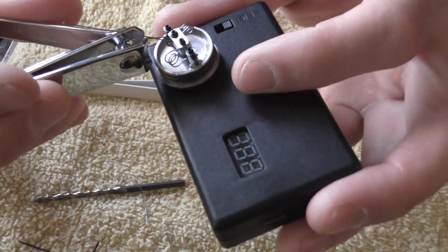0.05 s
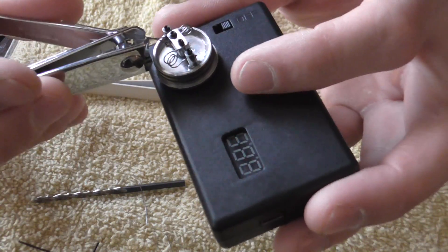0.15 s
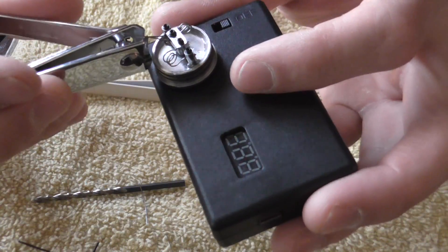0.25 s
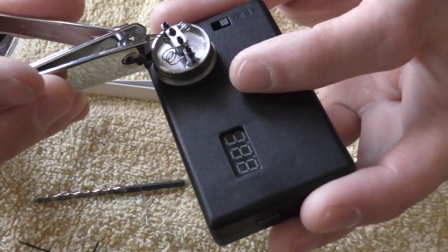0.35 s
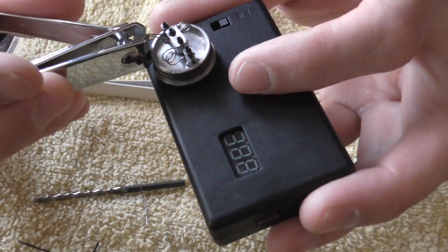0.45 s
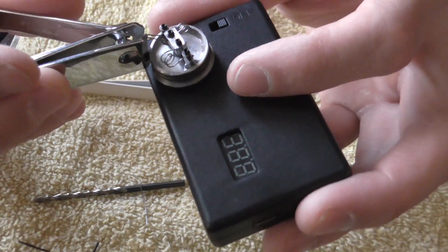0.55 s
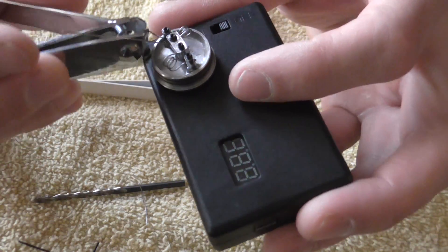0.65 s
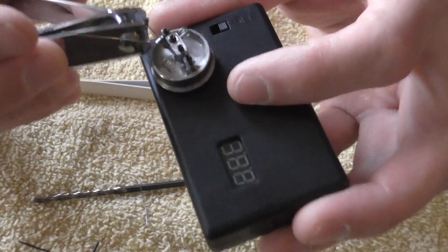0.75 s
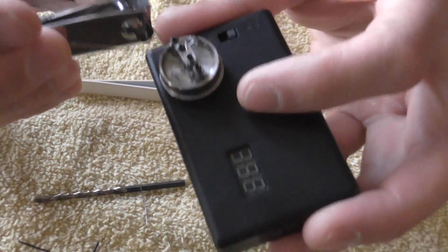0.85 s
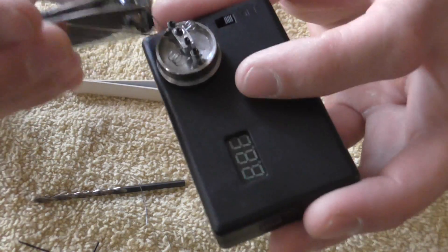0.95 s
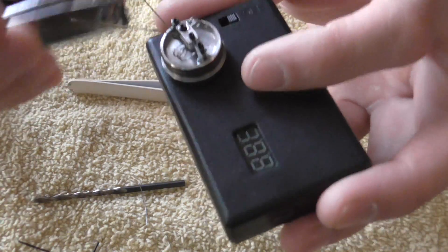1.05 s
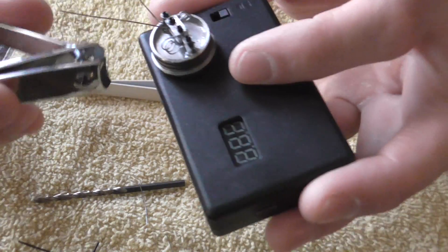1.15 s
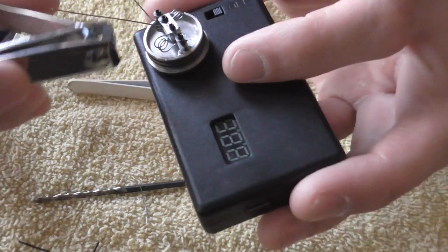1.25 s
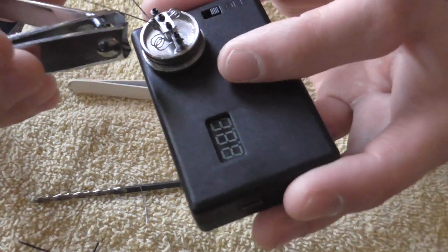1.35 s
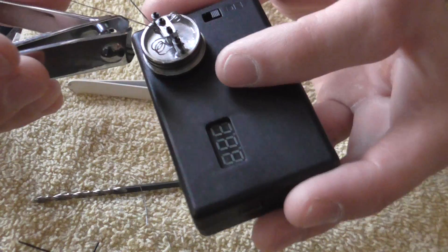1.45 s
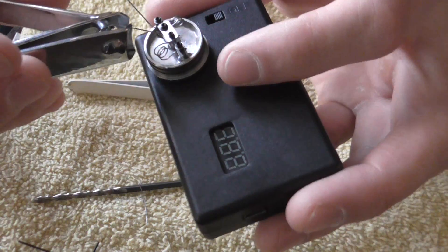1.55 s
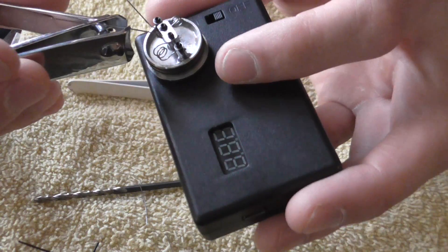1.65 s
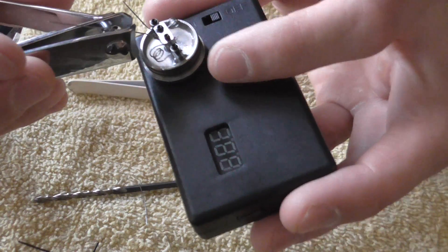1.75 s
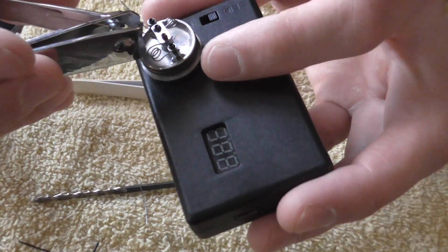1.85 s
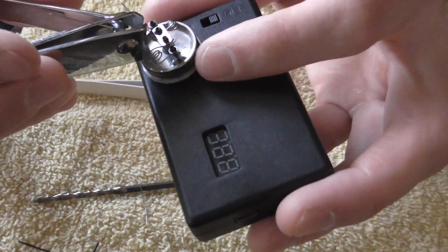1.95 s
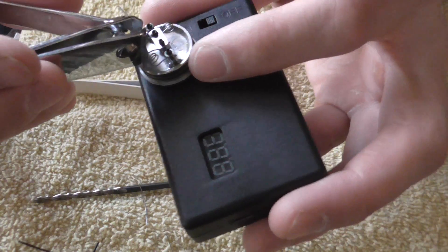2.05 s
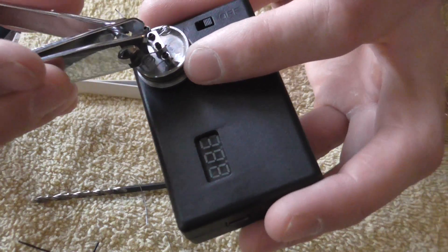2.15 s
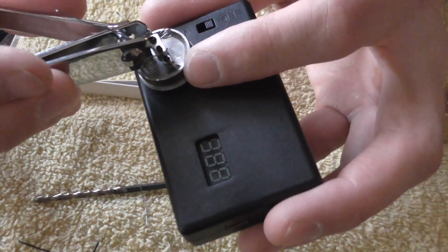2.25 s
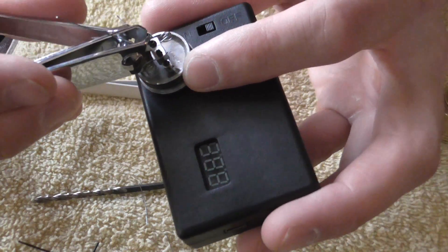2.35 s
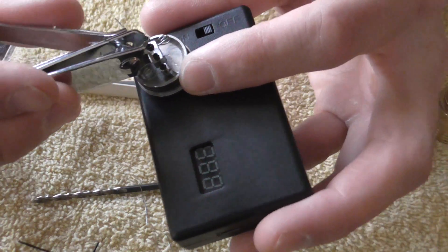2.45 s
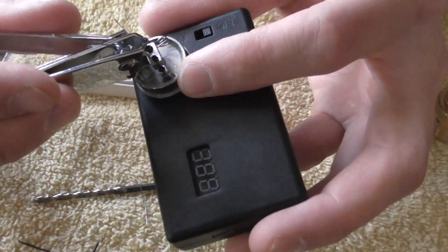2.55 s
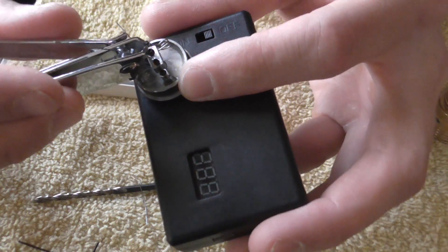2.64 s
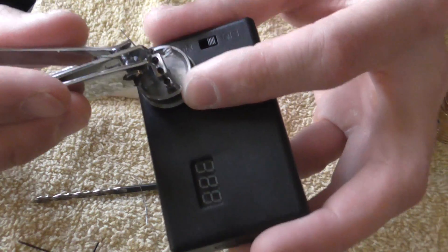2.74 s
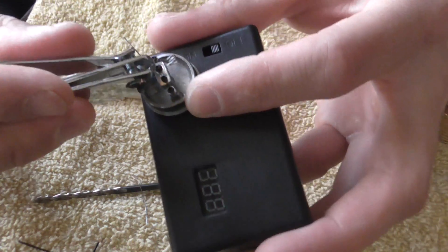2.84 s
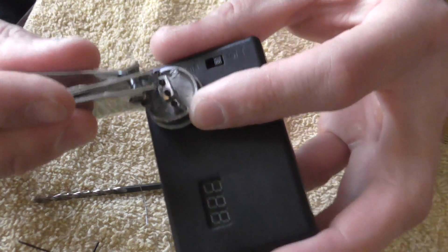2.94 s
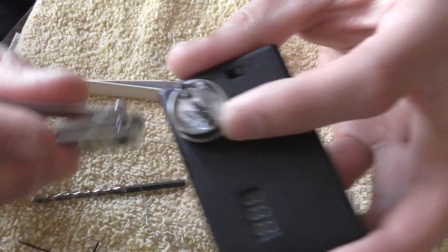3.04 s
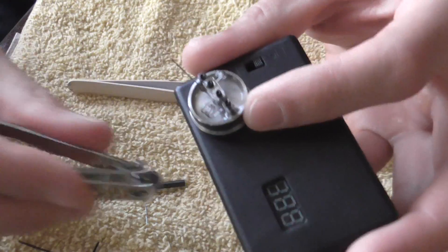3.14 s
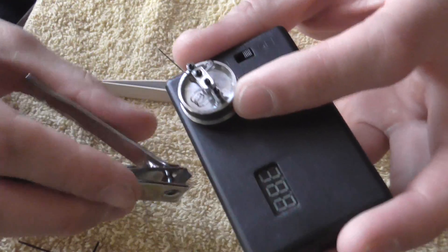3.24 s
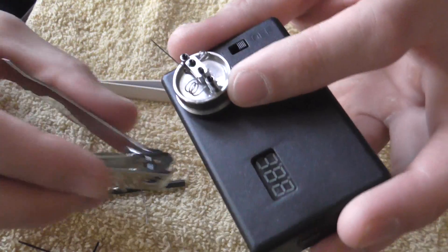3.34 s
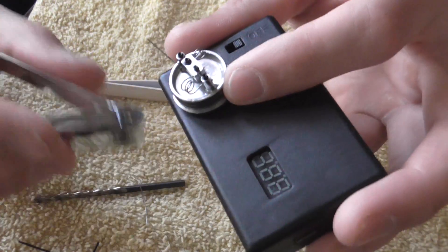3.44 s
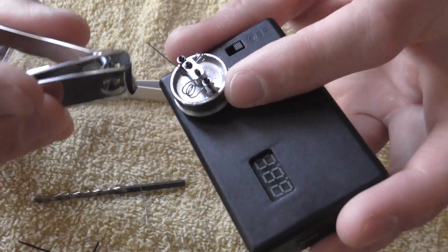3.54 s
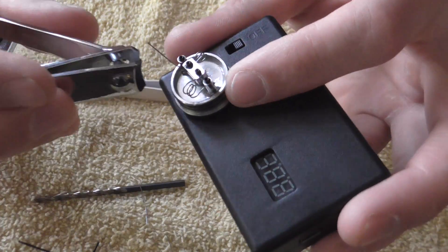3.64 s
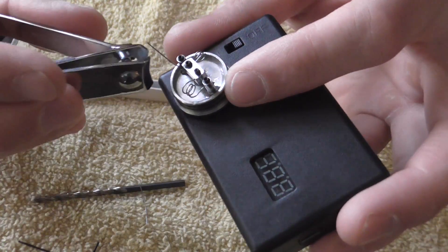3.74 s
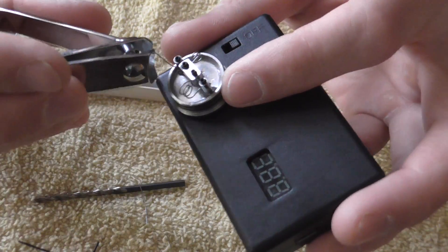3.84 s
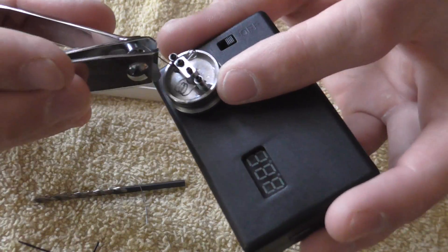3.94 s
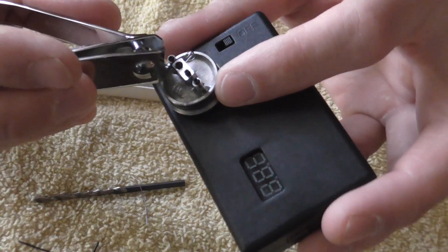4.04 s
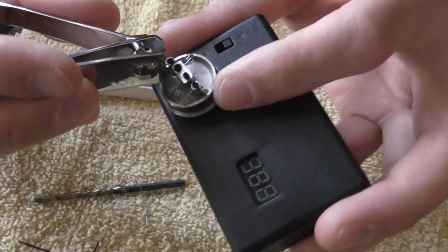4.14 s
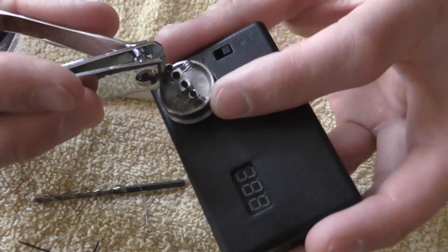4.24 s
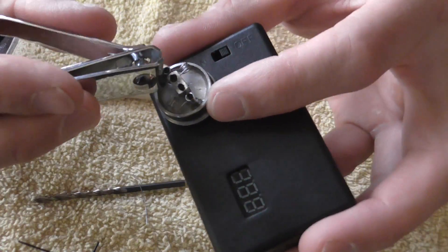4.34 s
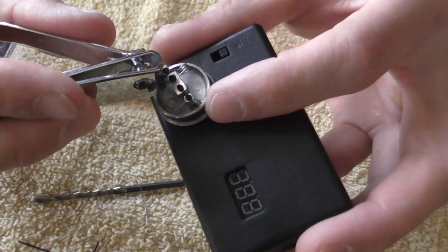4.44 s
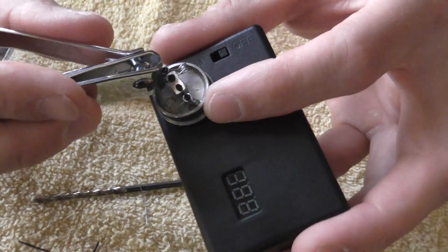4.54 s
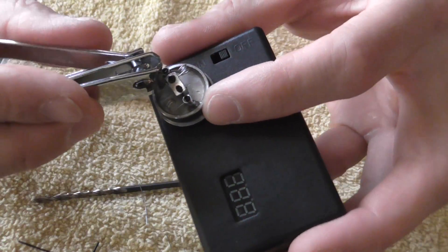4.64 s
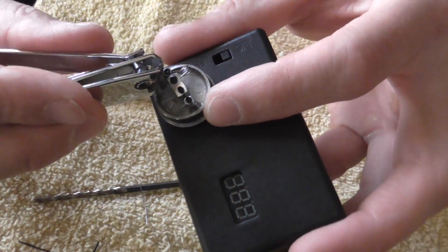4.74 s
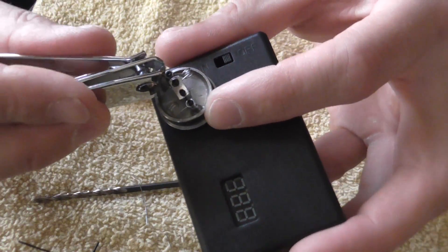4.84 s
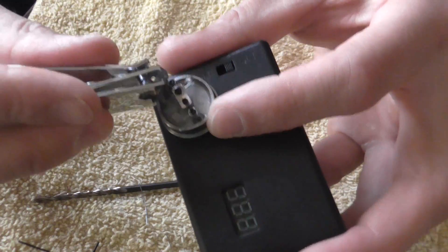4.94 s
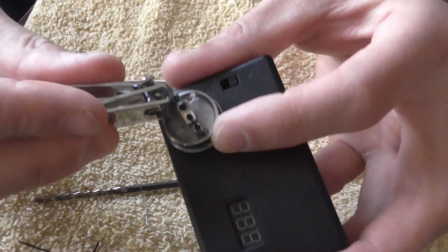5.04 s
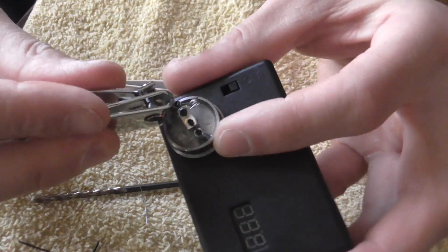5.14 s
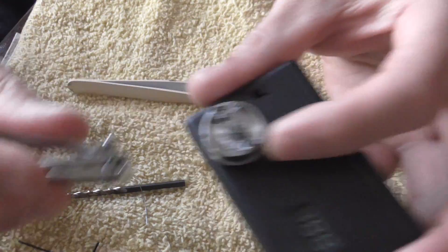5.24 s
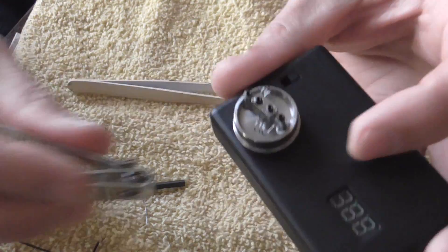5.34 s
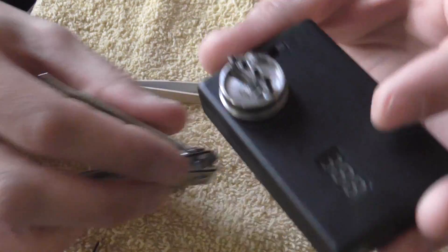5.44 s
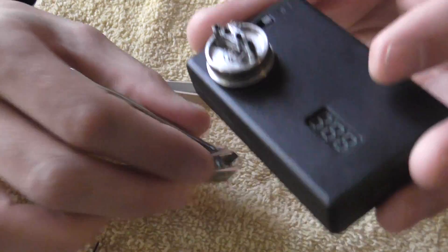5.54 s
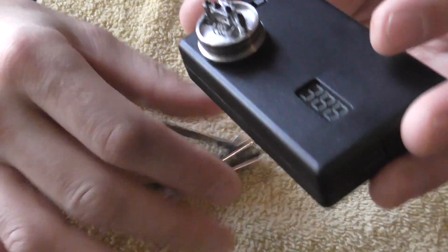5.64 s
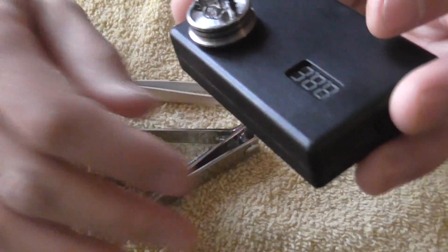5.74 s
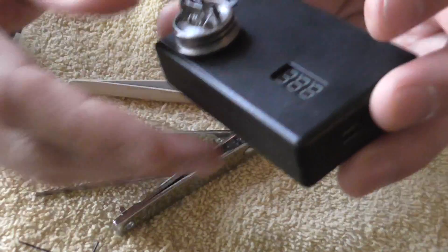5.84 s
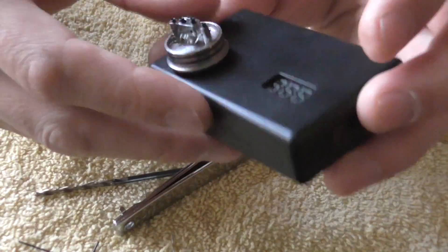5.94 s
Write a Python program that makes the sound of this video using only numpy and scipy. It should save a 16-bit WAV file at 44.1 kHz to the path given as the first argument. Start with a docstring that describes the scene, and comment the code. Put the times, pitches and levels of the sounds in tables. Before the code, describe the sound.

Close stereo microphone at a table, indoors, low hum behind. Tiny dry steel taps, some ringing briefly, mix with short gritty rubs on hollow plastic. One bright, abrupt snap is followed by clicks and lighter fumbling, then a second crisp snap. After a few firm knocks and a scrape, the metal clippers are put down with a soft bump and jittery clatter.

```python
"""Steel taps, gritty rubs and clinks lead to two sharp snips, then the clippers drop and rattle on a table.
Nail clippers cut two thin wire leads on a small plastic-cased device in a quiet room with a mains buzz.
Shaped noise makes the contacts, rubs and snips; dying sines make the clinks, the table and the lying steel.
Two ports hear it with close echoes and a room tail; gain control dips the sound after loud peaks."""
import sys
import numpy as np
from scipy import signal
from scipy.fft import rfft, irfft, next_fast_len
from scipy.io import wavfile
from scipy.ndimage import uniform_filter1d

SR = 44100
rng = np.random.default_rng(int(sys.argv[2]) if len(sys.argv) > 2 else 0)


def inscribe(sig):
    """Save sig as 16-bit PCM at rate SR to the path in sys.argv[1].

    A 1-D sig is mono; a 2-D sig holds one channel per row.
    Samples are clipped to [-1, 1] before scaling.
    """
    pcm = np.round(np.clip(np.atleast_2d(sig).T, -1, 1) * 32767)
    wavfile.write(sys.argv[1], SR, pcm.astype(np.int16))


def field_ratio(decibels):
    """Amplitude ratio for a level in dB (20 dB per decade); scalars and array-likes work."""
    return 10 ** (np.asarray(decibels, dtype=float) / 20)


N = 264159

# the jaws slam shut through a wire:
# (time [s], level [dB], left-right lean [dB], low lurch of opposite sign in the two ports [dB])
SNIP_EVENTS = [(2.899, 1.5, -1.5, -8), (5.1008, -0.5, -3.5, -11)]


def evened(x):
    """Scales to rms 1."""
    return x / np.sqrt(np.mean(x ** 2) + 1e-20)


def read(points, hz):
    """Reads a table on a log-frequency axis."""
    f, value = np.transpose(points)
    return np.interp(np.log(hz + 1), np.log(f + 1), value)


def add(mix, s, sound, pan_db=0.0):
    """Mixes a sound in at time s, leaning left (positive) or right."""
    part = mix[:, round(s * SR):][:, :len(sound)]
    sides = field_ratio(np.array([[pan_db / 2], [-pan_db / 2]]))
    part += sides * sound[:part.shape[1]]


def band(x, hz, width):
    """A broad resonance with steep sides."""
    low_hz = np.sqrt(hz ** 2 + width ** 2 / 4) - width / 2
    high_hz = min(low_hz + width, SR * .45)
    return signal.sosfilt(signal.butter(2, [low_hz, high_hz], "band", fs=SR, output="sos"), x)


def ring(modes):
    """Dying sines of a struck object."""
    t = np.arange(round(max(t60 for _, _, t60 in modes) * SR)) / SR
    return sum(field_ratio(db - 60 * t / t60) * np.sin(2 * np.pi * hz * t) for hz, db, t60 in modes)


def air():
    """Room tone and microphone hiss: coloured noise, faintly patchy, partly alike in the two ports."""
    # colour of the background: (frequency [Hz], relative level [dB per Hz])
    air_colour = [(18, -60), (42, -8.5), (78, 3), (98, -11.5), (179, -4.5), (295, -0.5), (540, -5.5),
                  (721, -3.5), (889, -5.5), (3060, -20), (13700, -24.5), (16000, -31.5)]
    # likeness of the ports: (frequency [Hz], left-right correlation [-1 to 1])
    likeness = [(60, 0.024), (180, -0.45), (500, -0.7), (800, -0.83), (1650, -0.13), (4970, 0.2),
                (15000, 0.26)]
    level_db, patch_db, right_db = -57, 0.92, 1.1
    frames, hz = N // 512 + 5, np.fft.rfftfreq(2048, 1 / SR)
    a, b, c, d, patches = rng.standard_normal((5, frames, 1025))
    patches = evened(uniform_filter1d(uniform_filter1d(patches, 20, 1), 8, 0))
    same = np.clip(read(likeness, hz), -1, 1)
    left = a + 1j * b
    right = same * left + np.sqrt(1 - same ** 2) * (c + 1j * d)
    z = np.array([left, right]) * field_ratio(read(air_colour, hz) + patch_db * patches)
    z[1] *= field_ratio(right_db)
    noise = signal.istft(z.transpose(0, 2, 1), nperseg=2048, noverlap=1536)[1][:, :N]
    return field_ratio(level_db) * evened(noise)


def buzz():
    """Mains harmonics of some appliance, the level of each wavering a little and apart in the two ports."""
    # hum spectrum: (multiple of the mains frequency, level [dB rms])
    harmonics = [(1, -78), (2, -72), (5, -69), (6, -72), (7, -70), (8, -72), (9, -69), (10, -77), (11, -77),
                 (13, -79), (15, -78), (18, -79), (26, -83), (28, -80)]
    mains_hz, waver_db = 59.95, 0.5
    t = np.arange(N // 10 + 1) * 10 / SR  # low tones need a tenth of the sample rate
    out = np.zeros((2, len(t)))
    for k, db in harmonics:
        points = rng.standard_normal((2, 40))
        waver = np.array([np.interp(t, np.linspace(0, t[-1], 40), row) for row in points])
        tone = np.sin(2 * np.pi * (round(k) * mains_hz * t + rng.random()))
        out += np.sqrt(2) * field_ratio(db + waver_db * waver) * tone
    return signal.resample_poly(out, 10, 1, axis=1)[:, :N]


def room(x):
    """Room tail: sparse echoes of random sign, each band dying at its own speed."""
    # decay of the room: (frequency [Hz], t60 [s])
    decay = [(300, .3), (1200, .35), (4000, .3), (8500, .3), (12000, .22), (15000, .13)]
    echoes = np.zeros((2, SR // 2))
    at = np.arange(200, SR // 2 - 20, 20) + rng.integers(0, 20, (2, (SR // 2 - 201) // 20))
    np.put_along_axis(echoes, at, rng.choice([-1., 1.], at.shape), 1)
    hz, t, z = signal.stft(echoes, SR, nperseg=256)
    tail = signal.istft(z * field_ratio(-60 * t / read(decay, hz)[:, None]), SR, nperseg=256)[1]
    return signal.fftconvolve(x, tail / np.linalg.norm(tail[0]), axes=1)[:, :N]


def hands(x):
    """A few close echoes off the hands and table, different at each port."""
    echoes = np.zeros((2, 160))
    signs = rng.choice([-1., 1.], (2, 6)) / np.sqrt(6)
    np.put_along_axis(echoes, rng.integers(8, 160, (2, 6)), signs, 1)
    return signal.oaconvolve(x, echoes, axes=1)[:, :N]


def ports(z, lead, hz):
    """Two microphone ports hear the same sound with a phase lead."""
    return z * np.exp(.5j * np.array([read(lead, hz), -read(lead, hz)]))


def table_drop(mix):
    """Dull bumps ring the table, the lever chatters unevenly on the steel body and the nail file rings once."""
    # the clippers bump the table: (time [s], relative level [dB])
    bumps = [(5.726, -21.5), (5.746, 2), (5.757, -7.5), (5.769, -6.5), (5.79, -14), (5.81, -11.5),
             (5.832, -22), (5.849, -23.5), (5.902, -25.5)]
    # table modes: (frequency [Hz], relative level [dB], t60 [s])
    table_modes = [(122, 9.5, 0.1), (220.5, 2, 0.096), (280.4, -3, 0.15), (303, -2.5, 0.051),
                   (376.4, -4, 0.14), (460, -2, 0.039), (522, -15, 0.019), (622, -10, 0.076),
                   (765, -11.5, 0.072), (956, -9, 0.034)]
    # lever on body: (time [s], relative strength [dB], knock rate [1/s])
    chatter = [(5.738, -32.5, 290), (5.742, -26.5, 150), (5.75, -24, 200), (5.871, -41, 180),
               (5.929, -66.5, 85)]
    # clippers lying flat: (frequency [Hz], relative level [dB], t60 [s])
    lying_modes = [(1338, -13.5, 0.02), (1520, -21, 0.07), (2010, -22.5, 0.049), (3870, -12, 0.026),
                   (4336, -16.5, 0.11), (4563, -9.5, 0.025), (5400, -11.5, 0.1), (6000, -6.5, 0.0091),
                   (6400, -14, 0.031), (8000, 7, 0.0092), (8770, 1, 0.0187), (8400, -3, 0.023),
                   (8600, -9, 0.0081), (10560, 1.5, 0.0097), (12010, 2.5, 0.0084), (14030, -2, 0.0097),
                   (5060, -1.5, 0.0038), (7000, 2, 0.0026), (9650, 2.5, 0.0027), (13300, 2, .003)]
    # nail file struck once: (time [s], modes as (frequency [Hz], level [dB], t60 [s]))
    file_strike = (5.744, [(12605, -29, .27), (12570, -40, .2)])

    push = -np.hanning(36) / 18
    for s, db in bumps:
        thud = band(np.convolve(push, ring(table_modes)), 580, 1230)
        add(mix, s, field_ratio(db - 13.5) * thud, -1.2)

    s, strength_db, per_s = np.transpose(chatter)
    t = np.arange(s[0], s[-1], 1 / SR)
    turns = np.cumsum(np.interp(t, s, per_s)) / SR  # knocks so far
    uneven = field_ratio(5.5 * rng.standard_normal(100))[turns.astype(int)]
    pulses = 0.16 + uneven * np.exp(-(turns % 1) / 0.14)
    grit = rng.standard_normal((len(lying_modes), len(t))) * pulses
    grit *= field_ratio(np.interp(t, s, strength_db) - 12.0)
    for knocks, mode in zip(grit, lying_modes):
        # the knocks grow duller as they weaken
        knocks = knocks * field_ratio(-60. * (t - s[0]) * np.log2(mode[0] / 6000))
        add(mix, s[0], signal.fftconvolve(knocks, ring([mode])), -3.0)

    add(mix, file_strike[0], ring(file_strike[1]), -2.5)


def rubs(mix):
    """Gritty slips under rising and falling pressure excite two case hollows and a thin steel hiss."""
    # steel dragged along the device: (start [s], length [s], firmest moment [0-1 of the stroke],
    # plastic case level [dB], steel hiss level [dB])
    strokes = [(0.709, 0.069, 0.65, -49, -74), (0.833, 0.072, .3, -77, -57.5), (1.02, 0.047, .4, -74, -69),
               (1.297, 0.064, 0, -60.5, -55), (1.369, 0.14, 0, -65, -62), (1.585, 0.031, .03, -45, -58),
               (1.759, 0.084, 0.18, -55.5, -54.5), (1.977, .065, 0.1, -45, -64),
               (2.053, 0.084, 0.64, -47.5, -68.5), (2.167, 0.13, 0.47, -57.5, -68),
               (2.283, .115, 0.15, -60.5, -59.5), (2.997, 0.042, 0.85, -44, -58),
               (3.105, 0.12, 0, -52, -69), (3.259, .14, .3, -68, -64.5), (3.496, 0.13, 0, -62.5, -50),
               (3.715, 0.062, .03, -80, -61.5), (4.08, 0.063, .8, -64, -77), (4.293, 0.11, 0.22, -56, -59),
               (4.435, 0.037, 0.5, -53, -65), (4.481, 0.1, 0, -53.5, -82), (4.713, .12, 0.85, -61, -86),
               (5.11, 0.12, 0.32, -43.5, -46.5), (5.242, 0.019, 0.64, -26.5, -43),
               (5.263, 0.29, 0, -48.5, -57), (5.898, 0.098, 0.95, -45.5, -55)]
    start_db, end_db = -8.5, -20  # pressure at either end, below the firmest moment
    grit_db = 2.8  # unsteadiness of the slips
    for s, length, firmest, case_db, hiss_db in strokes:
        u = np.linspace(0, 1, round(length * SR))
        pressure = field_ratio(np.interp(u, [0, np.clip(firmest, .01, .99), 1], [start_db, 0, end_db]))
        unsteady = evened(uniform_filter1d(rng.standard_normal(len(u)), 120))
        slips = rng.standard_normal((2, len(u))) * field_ratio(grit_db * unsteady)
        case = evened(band(slips[0], 1194, 415) + band(slips[0], 1480, 580) * 0.74)
        hiss = evened(band(slips[1], 5220, 1900))
        stroke = pressure * (field_ratio(case_db) * case + field_ratio(hiss_db) * hiss)
        add(mix, s, stroke * signal.windows.tukey(len(u), .1))


def taps(mix):
    """Contact noise swells over the contact length, then dies; it rings the damped steel unevenly."""
    # jaws touching the device: (time [s], jaw level [dB], plastic case level [dB],
    # cutting edge level [dB], contact length [s])
    contacts = [(0.065, -65, -64, -61.5, 0.0084), (0.173, -55, -53, -42, 0.0059),
                (0.2964, -54.5, -54, -76, 0.021), (0.309, -44.5, -39.5, -33, 0.002),
                (0.537, -60, -58, -60, 0.016), (0.6696, -52, -56, -50.5, 0.0042),
                (0.6952, -49.5, -54, -54, 0.0078), (0.725, -66, -51, -81, 0.0022),
                (0.741, -60, -45, -54, 0.0034), (0.8134, -59, -49, -58, 0.013),
                (0.886, -41, -38, -34.5, 0.0045), (1.013, -74, -59, -60.5, 0.0096),
                (1.355, -61, -74, -57, 0.0047), (1.5424, -37, -53, -31.5, 0.0051),
                (1.546, -44.5, -42.5, -58.5, 0.016), (1.5747, -41, -67, -44, 0.0081),
                (1.657, -51.5, -59, -49, 0.009), (1.748, -57.5, -63, -56.5, 0.02),
                (1.8918, -62, -66, -50, 0.0026), (1.9353, -68, -58, -52, 0.0063),
                (1.9638, -42, -26.5, -58, 0.0027), (2.1307, -58, -43, -58, 0.0042),
                (2.1394, -54, -41.5, -64, 0.0091), (2.1472, -50.5, -38.5, -72, 0.0081),
                (2.2743, -49.5, -42.5, -68, 0.0037), (2.7454, -58, -54, -80, 0.0019),
                (2.988, -55, -51, -75, 0.0094), (3.0286, -57, -43.5, -69, 0.011),
                (3.0786, -29, -27.5, -37.5, 0.0018), (3.0928, -28.5, -25.5, -35.5, 0.00273),
                (3.326, -58.5, -66, -68, 0.011), (3.495, -51, -52, -38.5, 0.0053),
                (3.619, -56, -76, -52, 0.0018), (3.637, -60, -68, -60, 0.0048),
                (3.7088, -71, -78, -56.5, 0.0055), (3.7905, -60, -78, -50.5, 0.00086),
                (3.8274, -64, -78, -56, 0.0018), (4.001, -68.5, -76.5, -70, 0.025),
                (4.096, -83, -59, -64.5, 0.0058), (4.1435, -70, -48, -51.5, 0.001),
                (4.2847, -75, -33.5, -55, 0.0024), (4.3227, -55, -41.5, -80, 0.0028),
                (4.4312, -47, -38, -58, 0.0022), (4.4703, -39.5, -24, -49, 0.001),
                (5.2224, -46, -36, -54, 0.002), (5.2306, -27.5, -22.5, -68, 0.002),
                (5.2565, -20.5, -25, -57, 0.0018), (5.35, -62.5, -47.5, -68, 0.012),
                (5.4526, -63, -60, -47.5, 0.0042), (5.493, -52, -50.5, -26.5, 0.0022),
                (5.9842, -39, -43, -45, 0.0033)]
    # colour of jaw, then case: (centre [Hz], width [Hz])
    body_bands = [(3680, 4300), (1352, 863)]
    # hand-damped steel resonances: (centre [Hz], width [Hz])
    steel_modes = [(3500, 430), (5500, 520), (6700, 3300), (7700, 170), (8700, 1000), (10200, 145),
                   (11700, 250), (12900, 700), (14400, 2700)]
    # the ticks are brighter while the jaws hang open
    open_edge_hz, edge_hz, open_until_s = 8800, 6600, 1.7
    octaves_per_db = .008  # the more the edge outweighs the jaw, the higher it sounds
    t, hz = np.arange(2048) / SR, np.fft.rfftfreq(2048, 1 / SR)
    for s, *levels_db, length in contacts:
        base_hz = open_edge_hz if s < open_until_s else edge_hz
        treble_hz = base_hz * 2 ** (octaves_per_db * (levels_db[2] - levels_db[0]))
        treble_hz = np.clip(treble_hz, 5000, 12000)
        u = t / np.clip(length, .0008, .02)
        swell = (1 - np.exp(-u * 5)) * np.exp(-(u / 0.71) ** 0.67)
        grit = rng.standard_normal((3, len(t))) * swell
        weights = field_ratio(5.5 * rng.standard_normal(len(steel_modes)))
        steel = 0.019 + sum(a / (1 + 2j * (hz - f) / w) for a, (f, w) in zip(weights, steel_modes))
        grit[[0, 2]] = irfft(rfft(grit[[0, 2]]) * steel)  # jaw and edge, not the case
        bands = body_bands + [(treble_hz, 0.79 * treble_hz)]
        energy = np.sqrt(length * SR / len(t))  # longer contacts carry more
        colours = [evened(band(g, f, w)) * energy for g, (f, w) in zip(grit, bands)]
        add(mix, s - .0005, field_ratio(np.array(levels_db)) @ colours, -1.3)


def clinks(mix):
    """Each knock rings the nearest parts most; the fingers damp and shake the rings."""
    # free rings: (time [s], level [dB], place struck [index along the parts], loss one part away [dB],
    # looseness of the grip [factor on ring time])
    knocks = [(0.18, -29, 2.47, 22, 1.23), (0.310, -22, 2.27, 13, 0.53), (0.402, -52.5, .05, 8, 0.86),
              (0.556, -50.5, .05, 14, 1.6), (0.674, -32.5, 1.95, 21, 0.33), (0.886, -46, 4.6, 1, 1.4),
              (1.356, -34, 1.95, 25, 0.27), (1.556, -22, 0.48, 10.5, 0.27), (1.619, -49, 0.054, 9, 1.6),
              (3.095, -43, 0.058, 25, 0.38), (5.099, -28.5, 0.042, 14, 0.39)]
    # one list a part (lever, jaw, hinge, arm, edge):
    # (frequency [Hz], or ratio to the hinge pitch in the hinge, relative level [dB], t60 at looseness 1 [s])
    parts = [
        [(1268, 0, .4)],
        [(3790, -5, .2), (3530, -4, .09)],
        [(1, 0, .11), (.985, -6, .08), (.905, -15, .08)],
        [(1960, 0, .15)],
        [(2370, 0, .15), (2750, 1, .12), (7070, -2, .2), (10170, -4, .05), (11680, -3, .05), (12900, 0, .05)],
    ]
    hinge_top_hz, hinge_sag_hz = 5520, 140  # a loose grip lowers the hinge
    reach_power = 1.36  # rings weaken with distance from the knock
    shake_db, rise_s = 2.5, .002
    for s, db, place, loss_db, loose in knocks:
        hinge_hz = hinge_top_hz - hinge_sag_hz * loose
        for k, modes in enumerate(parts):
            level_db = db - loss_db * abs(k - place) ** reach_power
            part = ring([(hz * hinge_hz if hz < 2 else hz, mode_db, t60 * loose)
                         for hz, mode_db, t60 in modes])
            unsteady = evened(uniform_filter1d(rng.standard_normal(20000), 500))
            shake = field_ratio(shake_db * unsteady[:len(part)])
            rise = 1 - np.exp(-np.arange(len(shake)) / SR / rise_s)
            add(mix, s, field_ratio(level_db) * part[:len(shake)] * shake * rise)


def lurches():
    """A short low push at each snip, opposite in left and right."""
    out = np.zeros((2, N))
    u = np.arange(600) / SR / 0.00024
    for s, _, _, db in SNIP_EVENTS:
        add(out, s, field_ratio(db) * (u - u ** 2 / 4) * np.exp(-u / 1.78), 0)
    return out * [[-1], [.45]]


def snips(mix):
    """A jaw crash of a few milliseconds at most, with a weak shudder and a bright hiss that starts with it and
    dies away."""
    # each wire snaps with its own colour, one list a snip: (frequency [Hz], relative level [dB per Hz])
    snap_colours = [
        [(88, -56), (150, -32.5), (1560, 0), (2100, -20.5), (3700, -25.5), (4670, -7), (6390, -17), (8400, 2.5),
         (9630, -15), (10600, 3), (11300, -4), (14000, 5), (16000, -35)],
        [(88, -52.5), (150, -21.5), (1240, -11.5), (2100, -18), (2500, -4.5), (2980, -3.5), (3420, -30),
         (4320, -6), (6770, -21.5), (8400, 1), (12200, -12), (15100, -20), (16000, -26.5)],
    ]
    crash_s, shudder_db, shudder_s = .0019, -16, .005
    spray_hz, spray_width_hz, spray_db, spray_s = 9600, 7500, -34, .042
    t, slow = np.arange(2048) / SR, np.arange(8192) / SR
    hz, all_hz = np.fft.rfftfreq(2048, 1 / SR), abs(np.fft.fftfreq(2048, 1 / SR))
    for (s, db, pan_db, _), colour in zip(SNIP_EVENTS, snap_colours):
        envelope = np.exp(-(t / crash_s) ** 2) + field_ratio(shudder_db) * np.exp(-t / shudder_s)
        crash = rng.standard_normal(2048) * envelope
        # minimum phase keeps the colouring from ringing ahead of the crash
        phase = -signal.hilbert(np.log(field_ratio(read(colour, all_hz)))).imag
        snap = irfft(rfft(crash) * field_ratio(read(colour, hz)) * np.exp(1j * phase[:len(hz)]))
        add(mix, s, field_ratio(db) * snap / abs(snap).max(), pan_db)
        hiss = evened(band(rng.standard_normal(8192), spray_hz, spray_width_hz))
        add(mix, s, field_ratio(db + spray_db) * hiss * np.exp(-slow / spray_s), pan_db)


def scene():
    """Hand work at the table, its close echoes and room tail, and the background."""
    # sounds at the table: (frequency [Hz], phase by which the left port leads [radians])
    near_lead = [(0, 0), (3000, 0), (7000, 0.1), (9000, -0.5), (11500, 1.2), (14500, 1.6), (16400, 0.5)]
    near = np.zeros((2, N))
    for source in (table_drop, rubs, taps, clinks, snips):
        source(near)
    size = next_fast_len(N)
    hz = np.fft.rfftfreq(size, 1 / SR)
    direct = irfft(ports(rfft(near, size), near_lead, hz), size)[:, :N]
    echoes = field_ratio(-25) * hands(near) + field_ratio(-17.5) * room(near)
    return direct + echoes + lurches() + air() + buzz()


def low_pass(x):
    """Removes everything above the highest recorded frequency."""
    return signal.sosfilt(signal.butter(12, 16800, fs=SR, output="sos"), x)


def record(dry):
    """Gain control falls after loud peaks and recovers; the input saturates softly."""
    power_db = 10 * np.log10(abs(uniform_filter1d((dry ** 2).mean(0), 200)) + 1e-12)
    fall = np.arange(N) * 79.0 / SR  # the held peak level sinks 79 dB a second
    held_db = np.maximum.accumulate(power_db + fall) - fall
    over_db = np.maximum(held_db + 40.0, 0)  # above a threshold of -40 dB
    late_db = signal.lfilter([.004], [1, -.996], over_db)  # the gain reacts a little late
    thin = signal.lfilter(*signal.butter(2, 50, "high", fs=SR), dry)  # the microphone drops deep bass
    mix = np.tanh(thin / field_ratio(0.3 * late_db))  # 0.3 dB of dip for each dB over
    return low_pass(mix)


dry = scene()
out = record(dry)
inscribe(out)
```